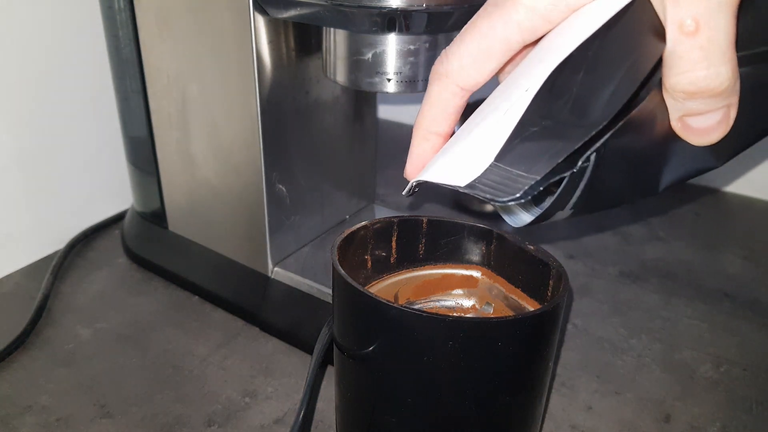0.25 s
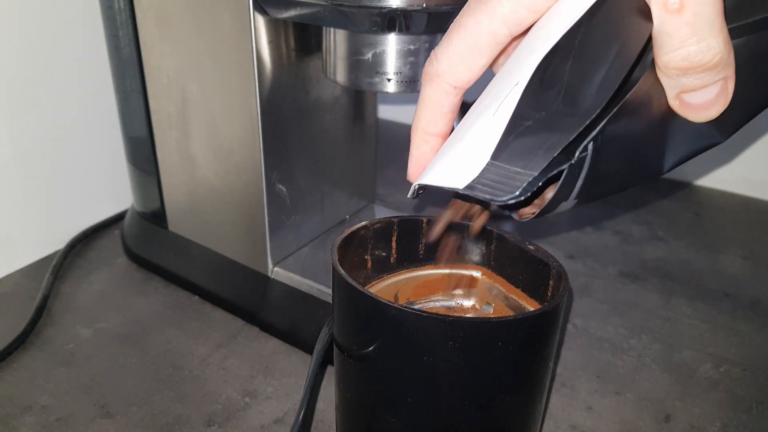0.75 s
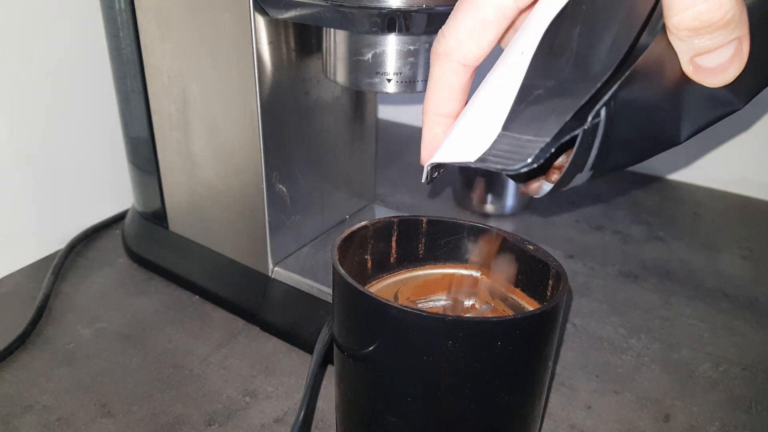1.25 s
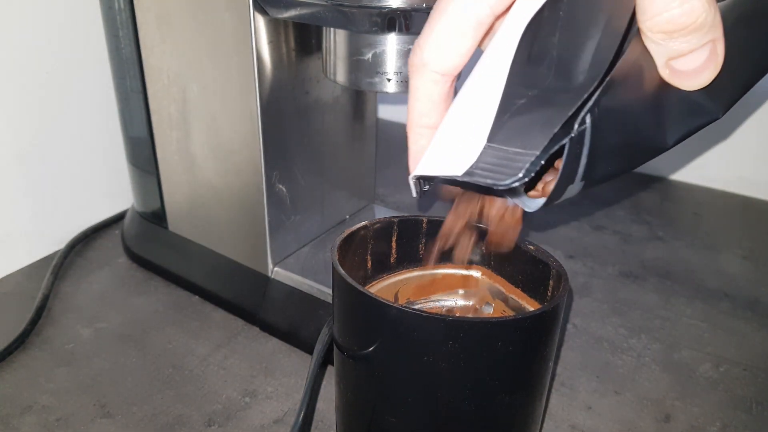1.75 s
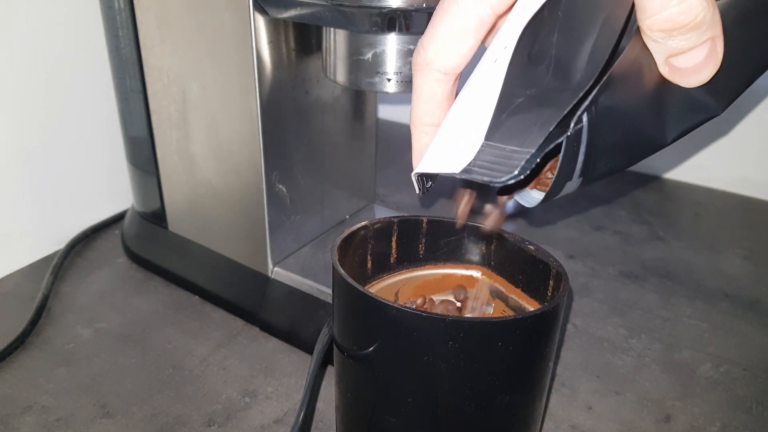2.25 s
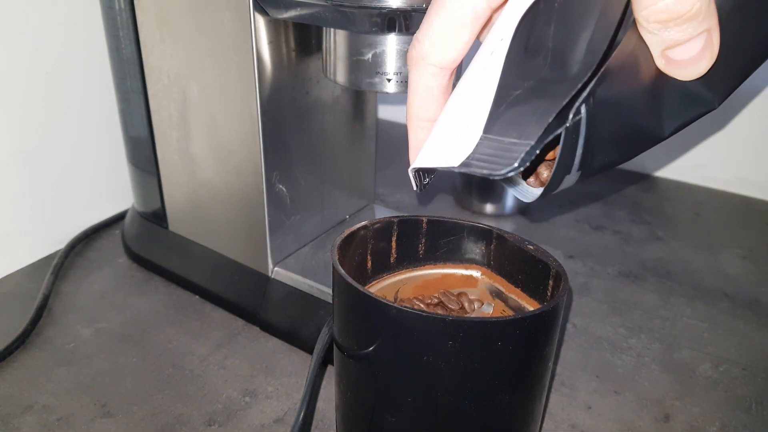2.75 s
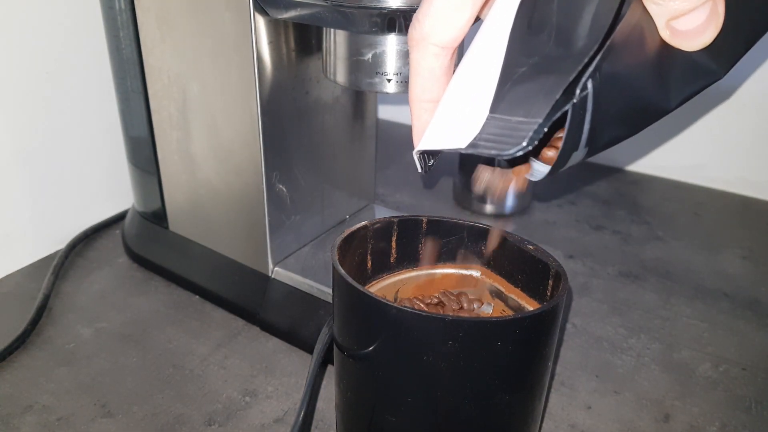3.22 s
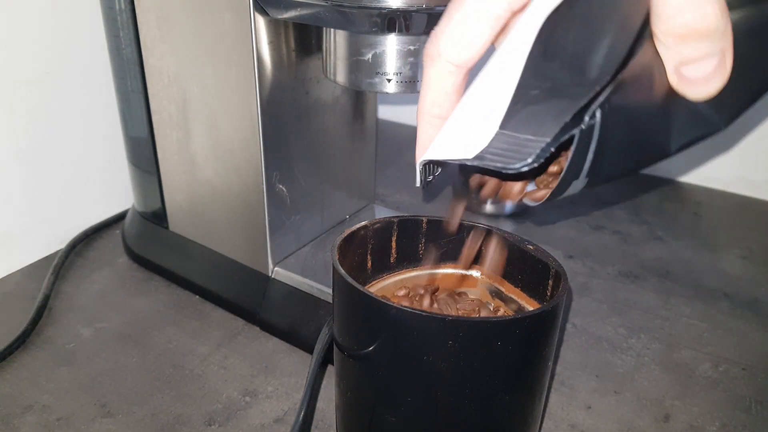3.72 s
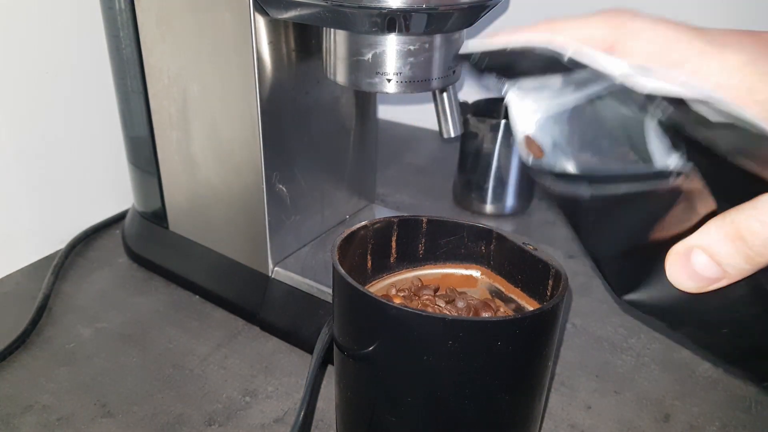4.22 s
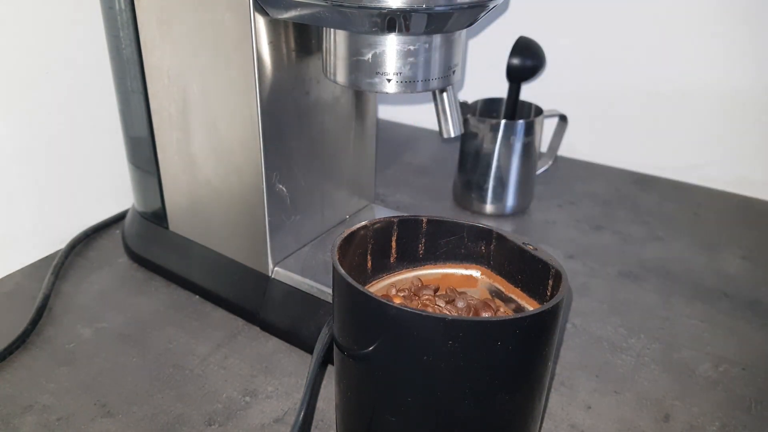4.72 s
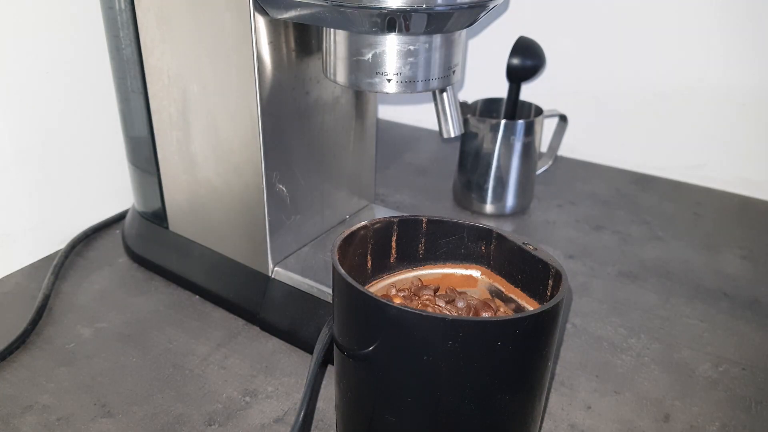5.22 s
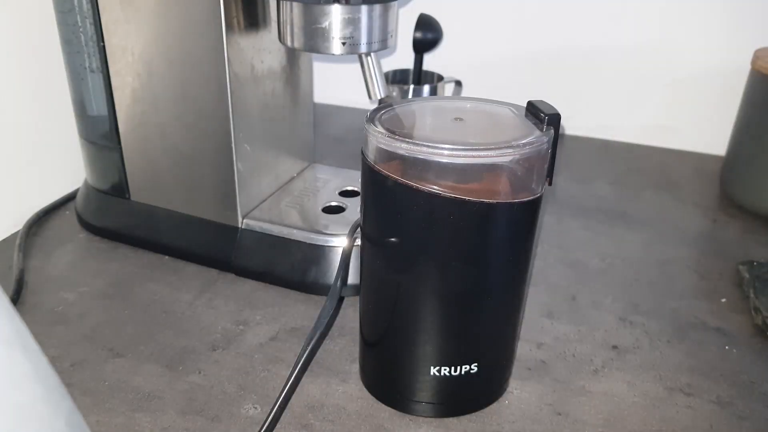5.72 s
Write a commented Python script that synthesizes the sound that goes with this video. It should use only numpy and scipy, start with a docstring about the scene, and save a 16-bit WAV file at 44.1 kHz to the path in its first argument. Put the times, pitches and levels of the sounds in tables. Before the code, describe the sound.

A plastic bag of coffee beans rustles and snaps softly as it tilts, building over the first 0.7 seconds. From about 0.7 to 3.9 seconds, beans slide out and drop into a grinder's steel bowl, clicking, hopping and making the metal ring briefly. They come in three surges, around 1, 1.8 and 3.5 seconds, with more light bean-on-bean ticking as the bowl fills. From 4 to 4.9 seconds the bag is tipped back: the plastic crinkles and snaps more loudly, and the beans slump inside with soft bumps. Around 5.1 seconds it brushes the counter with one short, bright clink. At about 5.4 seconds the sound breaks off with a faint thump, leaving a quiet, steady hiss and whir. Everything is close and almost wholly on the right, with the short echo of a small kitchen.

```python
"""In a small kitchen, coffee beans are shaken from a plastic bag into a switched-off grinder's steel bowl.
The bag rustles and snaps as it tilts, then beans come in surges, clicking and hopping on the ringing
bowl and on each other. The bag is tipped back, its heap slumps, and it is set down with a clink.
All this is close and almost wholly on the right. Near the end it breaks off with a soft thump,
leaving a faint, steady hiss and whir."""
import sys
import numpy as np
from scipy import signal
from scipy.fft import rfft, irfft
from scipy.io import wavfile

SR = 44100
rng = np.random.default_rng(int(sys.argv[2]) if len(sys.argv) > 2 else 0)


def store_wav(level_fs):
    """Save 16-bit WAV to argv[1]."""
    pcm = np.round(np.clip(np.atleast_2d(level_fs), -1, 1) * 32767)
    wavfile.write(sys.argv[1], SR, pcm.T.astype(np.int16))


N = 263277
T = np.arange(N) / SR
HIT_T = T[:SR // 5]  # the 0.2 seconds that one hit may last

# Levels in the tables are relative: the functions turn each sound up or down as a whole.
# The bag rustling as it tilts forward. Each row: time in seconds, level in dB.
TILT_LEVELS = [(0, -49.5), (0.18, -52), (0.27, -53.5), (0.35, -49), (0.42, -44.5), (0.52, -42),
               (0.64, -39.5), (0.76, -44.5)]
# The moving beans add weight and brightness. Each row: time in seconds, bass in dB, treble in dB.
TILT_TONE = [(.32, -23.5, -5), (0.431, -21.5, -4.5), (.7, -20, -1.5)]
# The tone of the rustling bag. Each row: frequency in Hz, level in dB.
BAG_COLOUR = [(30, -25), (65, -20), (140, -19), (270, -9), (420, -10.5), (700, 3), (1300, 4.5),
              (2100, -2.5), (5500, -15), (8130, -35.5), (12000, -21.5), (16000, -32)]
# Hollow tones the beans stir in and around the bag. Each row: pitch in Hz, width in Hz, level in dB.
HOLLOW_TONES = [(194.6, 28, 0), (553, 40, 4.5), (725.5, 15, 7.5), (1151, 45, 1.5), (1856, 24, 1)]
# The bag's wall buckling. Each row: start in seconds, level in dB, pitch in Hz, crack's share in dB.
BAG_SNAPS = [(0.083, -42, 1200, -6), (0.2258, -41.5, 2840, 12), (3.995, -72, 2500, 12),
             (4.062, -42, 2500, 14), (4.427, -35, 1100, -20), (4.455, -29.5, 980, -29),
             (4.472, -35.5, 960, -9), (4.485, -29, 810, -12), (4.503, -23.5, 1510, -17.5),
             (4.555, -30.5, 1070, -14.5), (4.6503, -20, 1094, -20.5), (4.745, -22.5, 1960, -9),
             (5.108, -40.5, 643, -2), (5.1247, -33.5, 2040, 9), (5.246, -35, 2184, 10),
             (5.316, -32.5, 1281, -27)]
# The tone of cracking plastic film. Each row: frequency in Hz, level in dB.
FILM_COLOUR = [(60, -31), (250, -4), (2000, 9.5), (4000, 6.5), (5800, 2), (7000, -10.5), (8300, -23),
               (11500, -8.5), (16000, -28)]
# The tone of sliding beans. Each row: frequency in Hz, level in dB.
SLIDE_COLOUR = [(40, -21.5), (70, -15.5), (250, -11), (420, -12.5), (600, -1.5), (1200, -1.5), (2000, 0),
                (5500, -16), (8000, -36), (16000, -16)]
# The tone of one bean's crack. Each row: frequency in Hz, level in dB.
CLICK_COLOUR = [(150, -15.5), (450, -18), (1000, -13), (2200, -2), (3000, 7.5), (4400, -2), (5800, -0.5),
                (7000, -4), (8200, -10.5), (9600, -3.5), (12000, 8.5), (16000, 1.5)]
# The steel bowl's ringing tones. Each row: pitch in Hz, level in dB, seconds to fade by 60 dB.
BOWL_TONES = [(2845, -2.5, 0.066), (3191, -0.5, 0.04), (3950, -6.5, 0.08), (4266, -5.5, 0.051),
              (4470, 1.5, 0.038), (4800, -4.5, 0.057), (5120, -9, 0.05), (5320, -13, 0.055),
              (6130, -4.5, 0.067), (9540, 5, 0.051), (10500, -5, 0.075)]
# Beans that stand out as they land.
# Each row: start in seconds, level of the lower clack in dB, level of the high tick in dB, ping in Hz.
BEAN_LANDINGS = [(.73, -36, -44, 4120), (.775, -27, -48, 3120), (0.785, -33, -39, 4900),
                 (0.819, -33, -36, 4500), (0.8305, -33, -47, 4470), (0.843, -26.5, -30.5, 5360),
                 (0.8511, -38, -46, 2820), (0.9039, -31.5, -32.5, 3310), (.919, -30, -40, 2710),
                 (0.9523, -38, -36, 4338), (.965, -34, -35, 4140), (1.024, -36.5, -36, 4435),
                 (1.0745, -52, -41.5, 4382), (1.09, -36, -47, 4338), (1.143, -40, -36, 3300),
                 (1.175, -38, -37, 2960), (1.1863, -34, -32.5, 3200), (1.282, -44.5, -41, 2930),
                 (1.293, -40, -37.5, 3250), (1.317, -38, -34, 4403), (1.343, -34, -39, 4300),
                 (1.391, -50, -42, 2950), (1.437, -41, -60, 3219), (1.513, -53, -47, 2810),
                 (1.531, -36.5, -42, 3197), (1.5555, -55, -34, 2939), (1.614, -31, -44, 3000),
                 (1.632, -34.5, -50, 4070), (1.687, -33.5, -36, 4425), (1.742, -33.5, -44, 3380),
                 (1.8105, -36.5, -38, 3070), (1.853, -32.5, -35.5, 2760), (1.8662, -42, -37, 2863),
                 (1.893, -47, -38, 3908), (1.912, -34.5, -39, 3950), (1.988, -34.5, -41, 3100),
                 (2.022, -38, -42, 3200), (2.073, -44, -40, 4295), (2.0951, -33.5, -37.5, 4270),
                 (2.1791, -33, -35.5, 3830), (2.271, -46, -40.5, 2840), (2.337, -39, -48, 2980),
                 (2.359, -36, -50, 5500), (2.3777, -41, -51, 3197), (2.401, -37.5, -37, 3230),
                 (2.516, -41, -43, 2820), (2.5717, -36.5, -51, 3972), (2.598, -39, -38.5, 3983),
                 (2.652, -44, -44, 2885), (2.7717, -50, -36.5, 2616), (2.892, -41.5, -47.5, 2917),
                 (3.014, -46.5, -45, 2853), (3.099, -49, -43.5, 5050), (3.155, -44, -41.5, 5540),
                 (3.172, -44, -43, 3994), (3.2062, -43.5, -44, 2799), (3.2645, -37, -44.5, 3330),
                 (3.3135, -43, -39, 2767), (3.3533, -34.5, -56, 4430), (3.405, -44, -43, 2750),
                 (3.48, -55, -40.5, 3316), (3.583, -44, -40, 2870)]
# The stream into the bowl, three surges with lulls between. Each row: time in seconds, level in dB.
FLOW_LEVELS = [(0.74, -50), (0.84, -49), (0.95, -41), (1.05, -48), (1.2, -40.5), (1.27, -51.5),
               (1.37, -48.5), (1.49, -62), (1.66, -42), (1.78, -48.5), (1.88, -41.5), (2.12, -46),
               (2.23, -51), (2.55, -49.5), (2.84, -58.5), (3.14, -57.5), (3.3, -54), (3.52, -45),
               (3.8, -51), (3.93, -62)]
# Beans sliding towards the bag's mouth. Each row: time in seconds, level in dB.
SLIDE_LEVELS = [(0.76, -44), (1.1, -49.5), (1.27, -53), (1.7, -46), (2.0, -45.5), (2.22, -49), (2.5, -45),
                (2.63, -54.5), (2.77, -48.5), (2.87, -59.5), (2.93, -52.5), (3.13, -51), (3.34, -48),
                (3.365, -41), (3.85, -46), (3.93, -50)]
# The tones of the grinder's housing and cup. Each row: pitch in Hz, width in Hz, level in dB.
HOUSING_TONES = [(168.5, 19, -5), (564, 22.6, -3), (745, 64, -9), (1160, 55, -7)]
# Soft bumps, mostly the bag on grinder and counter; the last is a faint thump as the sound breaks off.
# Each row: start in seconds, level in dB, pitch in Hz.
SOFT_BUMPS = [(1.449, -42, 350), (3.288, -49, 110), (3.333, -48, 91), (4.484, -30, 235),
              (4.651, -34.5, 85.2), (4.718, -38, 249), (5.39, -56.5, 55)]
# The bag rustling as it is tipped back and carried off. Each row: time in seconds, level in dB.
TIP_BACK_LEVELS = [(3.95, -52.5), (4.0, -40), (4.035, -47), (4.07, -36.5), (4.11, -42), (4.22, -40.5),
                   (4.27, -37.5), (4.38, -33.5), (4.44, -38.5), (4.51, -35), (4.69, -39), (4.77, -36),
                   (4.87, -40.5), (4.95, -58.5), (5.1, -58.5)]
# The bag brushing the counter. Each row: start in seconds, hold in seconds, level in dB.
COUNTER_BRUSHES = [(5.111, 0.049, -39.5), (5.222, 0.092, -35.5)]
# The tones of a hard thing on the counter. Each row: pitch in Hz, level in dB, seconds to fade by 60 dB.
CLINK_TONES = [(2030, -2, 0.047), (3960, 1, 0.019), (5300, -1, 0.017)]
# The little that reaches the left channel. Each row: frequency in Hz, level in dB.
LEFT_COLOUR = [(60, -38), (170, -24), (600, -53.5), (1500, -62.5), (2400, -32.5), (4000, -52),
               (7000, -45.5), (9500, -30), (16000, -30.5)]
# The tone of the steady hiss. Each row: frequency in Hz, level in dB.
HISS_COLOUR = [(30, -22.5), (43, -9.5), (64, 3), (77, -4.5), (324, -10.5), (1020, -18), (2240, -17.5),
               (8060, -32.5), (11900, -15.5), (15500, -13)]


def undb(db):
    """Turn decibels into a number to multiply by."""
    return 10 ** (np.asarray(db) / 20)


def rms(x):
    """The average strength of a sound (root mean square)."""
    return np.sqrt(np.mean(x ** 2))


def band(x, lo_hz, hi_hz, order=3):
    """Keep what lies between two frequencies."""
    sos = signal.butter(order, [lo_hz, min(hi_hz, SR / 2 - 1)], "band", fs=SR, output="sos")
    return signal.sosfilt(sos, x)


def resonate(x, hz, width_hz):
    """Let a sound ring at one pitch; a narrower width rings longer."""
    return signal.lfilter(*signal.iirpeak(hz, hz / width_hz, fs=SR), x)


def colour(x, points, size=2048):
    """Shape a sound's tone along a curve of (Hz, dB) points."""
    hz, db = np.transpose(points)
    bin_hz = np.arange(size // 2 + 1) * SR / size + 1
    log_gain = np.log(undb(np.interp(np.log(bin_hz), np.log(hz), db)))
    # fold the filter so that nothing sounds before the hit that causes it
    cepstrum = irfft(log_gain)
    cepstrum[1:size // 2] *= 2
    cepstrum[size // 2 + 1:] = 0
    return signal.fftconvolve(x, irfft(np.exp(rfft(cepstrum))))[:len(x)]


def fade(t60):
    """A fade that falls by 60 dB in t60 seconds."""
    return np.exp(-np.log(1000) * HIT_T / t60)


def burst(t60):
    """A puff of noise that dies away."""
    return rng.standard_normal(len(HIT_T)) * fade(t60)


def add(out, start_s, x):
    """Mix x into out at the given time."""
    i = max(int(start_s * SR), 0)
    out[i:i + len(x)] += x[:N - i]


def unit_band(x, lo_hz, hi_hz):
    """Scale a sound so that its strength between two frequencies is 1."""
    return x / rms(band(x, lo_hz, hi_hz))


def unit_hit(x):
    """Scale a hit so that its first 6 ms have strength 1."""
    return x / rms(x[:265])


def gain_curve(table):
    """Loudness over time from (seconds, dB) points, dying away quickly before and after them."""
    s, db = np.transpose(table)
    outside_s = np.maximum(np.maximum(s[0] - T, T - s[-1]), 0)
    return undb(np.interp(T, s, db)) * np.exp(-outside_s * 100)


def wander(per_s):
    """A curve that glides to a new random value per_s times a second."""
    steps = rng.standard_normal(len(HIT_T))
    return np.interp(T * per_s, np.arange(len(steps)), steps)


def contacts(per_s, spread_db):
    """Tiny taps at random times; more spread makes their sizes more uneven."""
    x = np.zeros(N)
    at = np.flatnonzero(rng.random(N) < per_s / SR)
    size = undb(spread_db * np.minimum(rng.exponential(size=len(HIT_T)), 4))
    x[at] = np.resize(rng.choice([-1, 1], len(size)) * size, len(at))
    return x / rms(x)


def rattle(per_s, spread_db, response, places=6):
    """Taps shared among several places, each with its own sound made by response()."""
    return sum(signal.oaconvolve(contacts(per_s / places, spread_db), response())[:N]
               for _ in range(places))


def whir(hz=2200, width_hz=240, db=-81.5):
    """A faint whir in the room: a narrow, steady band of noise, equally loud on both sides."""
    x = resonate(rng.standard_normal((2, N)), hz, width_hz)
    return undb(db) * x / rms(x)


def rustle(crisp_db, weight_db, per_s, spread_db, hollow_db, crumple_db=2.5):
    """Beans shift against the bag's wall: many dull taps that swell and sink in uneven crumples."""
    taps = colour(rattle(per_s, spread_db, lambda: burst(t60=0.011), places=16), BAG_COLOUR)
    hollow = sum(undb(db) * resonate(taps, hz, width) for hz, width, db in HOLLOW_TONES)
    x = taps + undb(hollow_db) * hollow
    body = unit_band(band(x, 430, 1750), 500, 1600)
    crisp = unit_band(band(x, 1750, 20000), 1900, 6500)
    weight = unit_band(band(x, 30, 430), 100, 400)
    crumples = undb(crumple_db * wander(per_s=30))
    return crumples * (body + undb(crisp_db) * crisp + undb(weight_db) * weight)


def tilt():
    """The bag tilts until the beans start to run; the rustle builds and gains body."""
    s, weight_db, crisp_db = np.transpose(TILT_TONE)
    x = rustle(np.interp(T, s, crisp_db), np.interp(T, s, weight_db),
               per_s=2400, spread_db=2.5, hollow_db=1.5, crumple_db=1.5)
    return gain_curve(TILT_LEVELS) * x


def snaps(tock_t60=0.0068, shudder_db=-4, shudder_width=0.41, beans_db=-13):
    """A panel of the bag flips: a short tock, a rough shudder, a crack of film and a rattle of beans."""
    out = np.zeros(N)
    for s, db, hz, crack_db in BAG_SNAPS:
        tock = np.sin(2 * np.pi * hz * HIT_T) * (fade(tock_t60) - fade(tock_t60 / 4))
        tock = unit_hit(band(tock, hz / 4, 20000, order=1))
        noise = rng.standard_normal(len(HIT_T))
        shudder = band(noise, hz / (1 + shudder_width), hz * (1 + shudder_width / 2), order=2)
        shudder = shudder / rms(shudder) * fade(t60=0.076)
        crack = unit_hit(colour(burst(t60=0.022), FILM_COLOUR))
        beans = unit_hit(colour(burst(t60=0.12), SLIDE_COLOUR))
        snap = tock + undb(shudder_db) * shudder + undb(crack_db) * crack + undb(beans_db) * beans
        add(out, s, undb(db) * unit_hit(snap))
    return out


def click(cup_db=-10, cup_spread_db=3, tail_db=-31):
    """A bean's dry crack; depending on where it lands, more or less of it echoes inside the cup."""
    crack, cup, tail = burst(t60=0.011), burst(t60=0.075), burst(t60=0.24)
    cup_gain = undb(cup_db + cup_spread_db * rng.standard_normal())
    return unit_hit(colour(crack + cup_gain * cup + undb(tail_db) * tail, CLICK_COLOUR))


def bean(ping_hz, width_hz=260, tones_db=1, contact_db=-10):
    """One bean makes a hard contact and colours its crack with four brief tones of its own."""
    crack = click()
    contact = unit_hit(colour(burst(t60=0.0024), CLICK_COLOUR))
    low = sum(resonate(crack, hz, width_hz) for hz in (ping_hz, rng.uniform(4150, 5850)))
    high = sum(resonate(crack, hz, 2 * width_hz) for hz in rng.uniform(10000, 15900, size=2))
    return undb(contact_db) * contact + crack + undb(tones_db) * unit_hit(low + high)


def bowl_ring(ping_hz=1, favour_db=0, favour_width=0.044, detune=0.026):
    """The bowl rings; the spot struck favours any tones near ping_hz, and beans lying there detune it."""
    hz, db, t60 = np.transpose(BOWL_TONES)[:, :, None]
    strength, shift = rng.standard_normal((2, len(BOWL_TONES), 1))
    near = np.exp(-(np.log(hz / ping_hz) / favour_width) ** 2)
    size = (1 - near) * strength * undb(db) + near * undb(favour_db)
    tones = np.sin(2 * np.pi * hz * (1 + detune * shift) * HIT_T)
    return unit_hit(np.sum(size * tones * fade(t60), axis=0))


def landings(clack_gain_db=-0.5, tick_gain_db=1, ring_db=-2, cushion=0.82, hop_db=-10):
    """Single beans drop into the bowl and hop twice, more softly each time."""
    out = np.zeros(N)
    for s, clack_db, tick_db, hz in BEAN_LANDINGS:
        # a bean that ticks more than it clacks has landed on other beans and rings the bowl less
        steel_gain = undb(ring_db + cushion * min(clack_db - tick_db, 0))
        for hop in range(3):
            hit = bean(hz) + steel_gain * bowl_ring(hz, favour_db=8)
            clack = undb(clack_db + clack_gain_db) * unit_hit(band(hit, 60, 8000))
            tick = undb(tick_db + tick_gain_db) * unit_hit(band(hit, 8000, 20000))
            add(out, s, undb(hop_db * np.sqrt(hop)) * (clack + tick))
            s += rng.uniform(0.0053, 0.019)  # seconds in the air
    return out


def pour(bounce_db=-3, tick_db=-7, tick_rise_db_per_s=2.65, slide_db=-1.5, ring_db=1, housing_db=17):
    """Beans slide out, bounce in the bowl and tick against each other; the housing drums along."""
    flow, sliding = gain_curve(FLOW_LEVELS), gain_curve(SLIDE_LEVELS)
    cracks = rattle(per_s=65, spread_db=2, response=click, places=16)
    clacks = unit_band(band(cracks, 100, 8000), 2600, 6500)
    ticks = unit_band(band(cracks, 9000, 19000), 9000, 16000)
    # as the bowl fills, more beans land on beans, so the ticks gain on the clacks
    tick_gain = undb(tick_db + tick_rise_db_per_s * (T - FLOW_LEVELS[0][0]))
    steel = rattle(per_s=130, spread_db=0.5, response=bowl_ring, places=16)
    # small bounces are too soft to wake the bowl's highest tones
    steel = unit_band(band(steel, 2000, 7000), 2600, 6500)
    bounces = undb(bounce_db) * (clacks + undb(ring_db) * steel)
    scrapes = rattle(per_s=900, spread_db=4, response=lambda: burst(t60=0.05), places=12)
    slide = undb(slide_db) * sliding * unit_band(colour(scrapes, SLIDE_COLOUR), 500, 2200)
    knocks = contacts(per_s=300, spread_db=4.5) * np.sqrt(flow * sliding) * undb(housing_db)
    housing = sum(undb(db) * resonate(knocks, hz, width) for hz, width, db in HOUSING_TONES)
    return flow * (bounces + tick_gain * ticks) + slide + housing


def bumps(swings=2.6):
    """Dull, low thuds, each a few dying swings; the last is a faint thump as the sound breaks off."""
    out = np.zeros(N)
    for s, db, hz in SOFT_BUMPS:
        thud = np.sin(2 * np.pi * hz * HIT_T) * fade(swings / hz)
        thud = band(thud, hz / 1.26, 3 * hz, order=2)
        add(out, s, undb(db) * thud / np.abs(thud).max())
    return out


def tip_back(gain_db=-1.5, crinkle_db=-11, slump_s=4.606, slump_width_s=0.2, muffle_db=-7.5):
    """Beans run back and the film crinkles; the slumping heap muffles the film and adds weight."""
    slump = np.exp(-((T - slump_s) / slump_width_s) ** 2)
    beans = rustle(crisp_db=-5.5 + muffle_db * slump, weight_db=-20 + 2 * slump,
                   per_s=1700, spread_db=2, hollow_db=-6.5)
    creases = rattle(per_s=45, spread_db=2, response=lambda: burst(t60=0.008))
    crinkle = colour(creases, FILM_COLOUR) * undb(4 * wander(per_s=20))  # comes in patches
    crinkle = undb(crinkle_db + muffle_db * slump) * crinkle / rms(crinkle)
    return undb(gain_db) * gain_curve(TIP_BACK_LEVELS) * (beans + crinkle)


def drag(start_s=4.49, db=-45, fall_db_per_s=90):
    """The heavy bottom of the bag drags for a moment with a low, rough scrape."""
    scrape = band(contacts(per_s=400, spread_db=3), 170, 330, order=2)
    return (T > start_s) * undb(db - fall_db_per_s * np.abs(T - start_s)) * scrape / rms(scrape)


def set_down(gain_db=-4, rise_s=0.014, fall_db_per_s=252):
    """Each brush of the bag on the counter rises quickly, holds and falls away as the beans settle."""
    push = np.zeros(N)
    for s, hold_s, db in COUNTER_BRUSHES:
        rise = np.clip((T - s) / rise_s, 0, 1)
        push += rise * undb(db - fall_db_per_s * np.maximum(T - s - hold_s, 0))
    beans = rustle(crisp_db=-7, weight_db=-12.5, per_s=2300, spread_db=0, hollow_db=-4.5, crumple_db=-3)
    return undb(gain_db) * push * beans


def clink(start_s=5.1247, gain_db=-32.5):
    """The bag knocks something hard on the counter, which gives one short, bright ring."""
    out = np.zeros(N)
    ring = sum(undb(db) * np.sin(2 * np.pi * hz * HIT_T) * fade(t60) for hz, db, t60 in CLINK_TONES)
    add(out, start_s, undb(gain_db) * unit_hit(ring))
    return out


def kitchen(x, echo_db=-14, t60=0.43):
    """Tiles and cupboards add a short, slightly dull wash of echoes."""
    t = T[:SR // 2]
    tail = rng.standard_normal(len(t)) * np.exp(-np.log(1000) * t / t60) * (t > 0.005)
    tail = band(tail, 170, 9700, order=1)
    return x + undb(echo_db) * signal.fftconvolve(x, tail / np.linalg.norm(tail))[:N]


def scene(break_off_s=5.387):
    """Bag and beans in the kitchen, loud on the right; the left gets only a faint, scattered trace."""
    bag_and_beans = tilt() + pour() + landings() + tip_back() + drag() + set_down() + snaps() + clink()
    right = kitchen(bag_and_beans) * (T < break_off_s) + bumps()
    scatter = burst(t60=0.084)
    trace = signal.fftconvolve(right, scatter / np.linalg.norm(scatter))[:N]
    left = colour(trace, LEFT_COLOUR)
    return 2 * np.array([left, right]) + whir()


def record(dry, hiss_db=-71, top_hz=15900):
    """Each channel gets its own steady hiss, and the highest treble is cut."""
    hiss = np.array([colour(rng.standard_normal(N), HISS_COLOUR) for _ in dry])
    low_pass = signal.ellip(10, 0.2, 80, top_hz, fs=SR, output="sos")
    hiss = undb(hiss_db) * hiss / rms(signal.sosfilt(low_pass, hiss))
    return signal.sosfilt(low_pass, dry + hiss)


dry = scene()
out = record(dry)
store_wav(out)
```